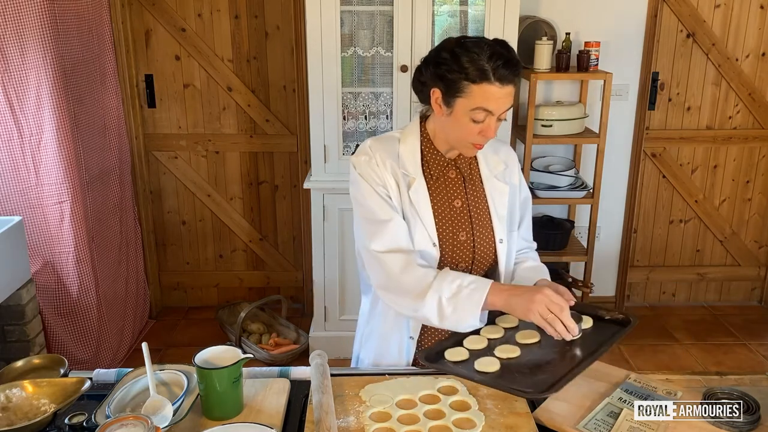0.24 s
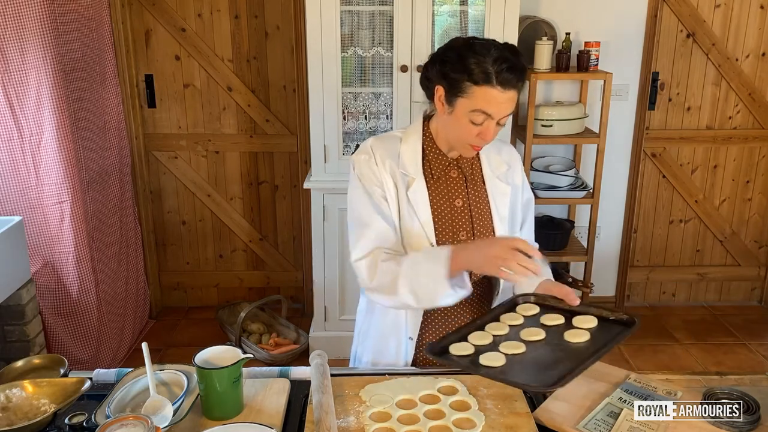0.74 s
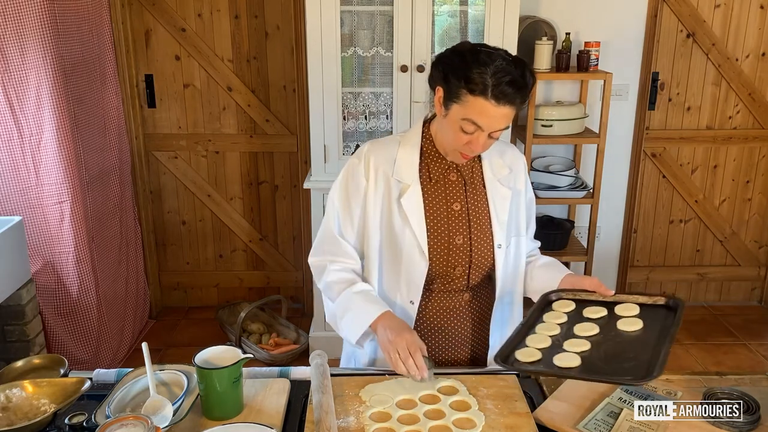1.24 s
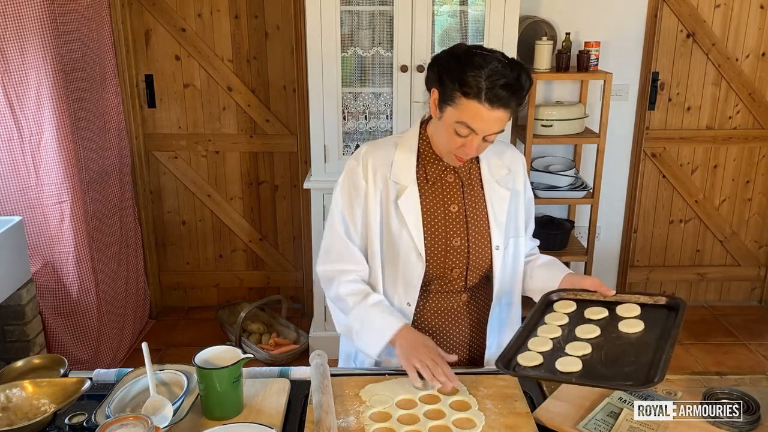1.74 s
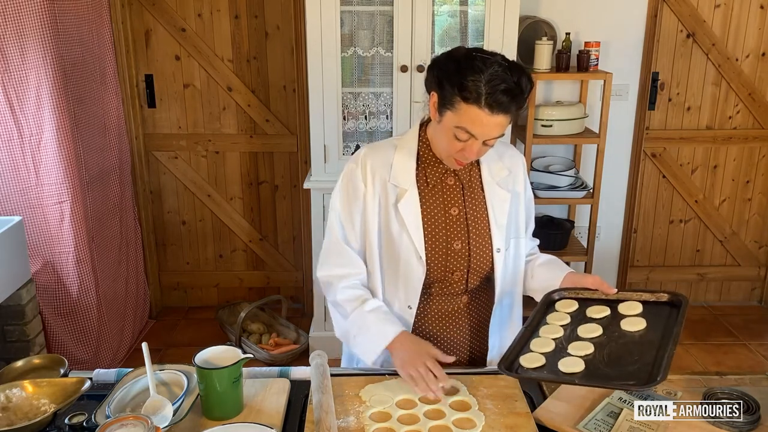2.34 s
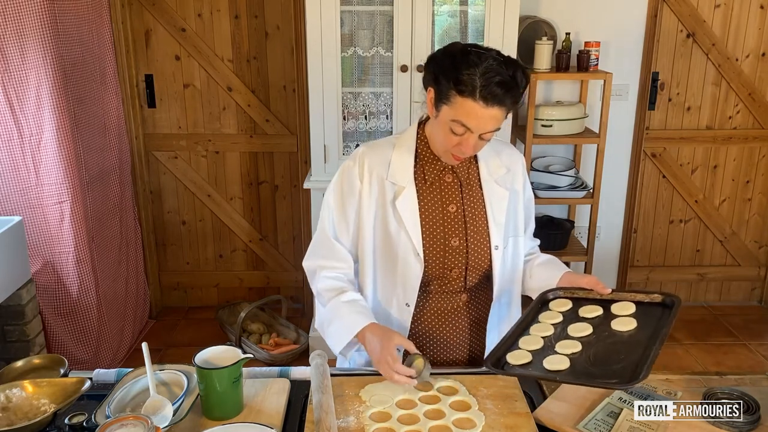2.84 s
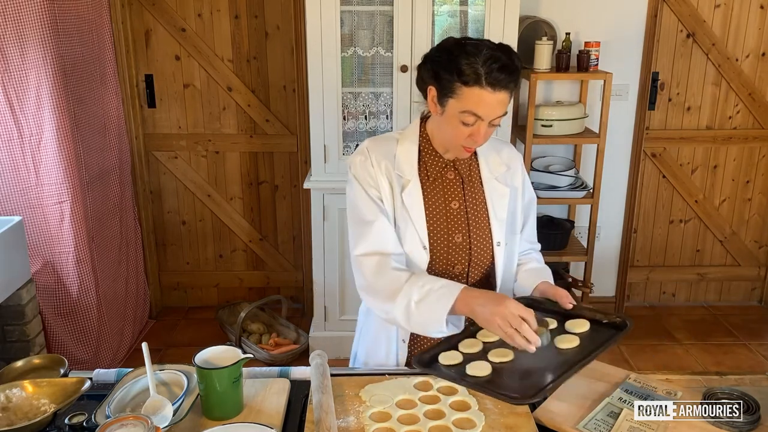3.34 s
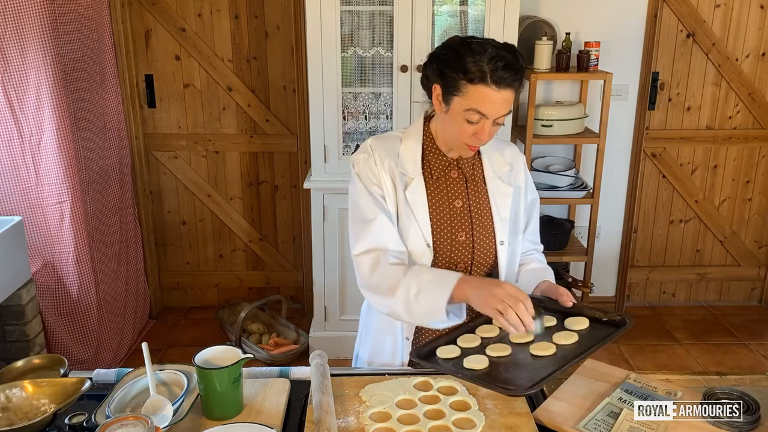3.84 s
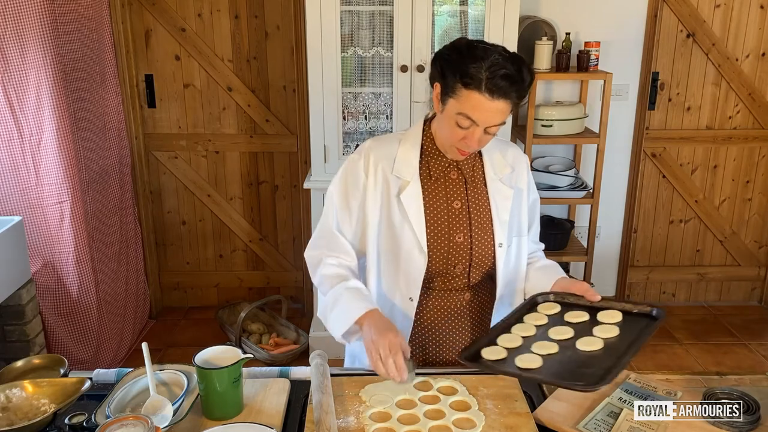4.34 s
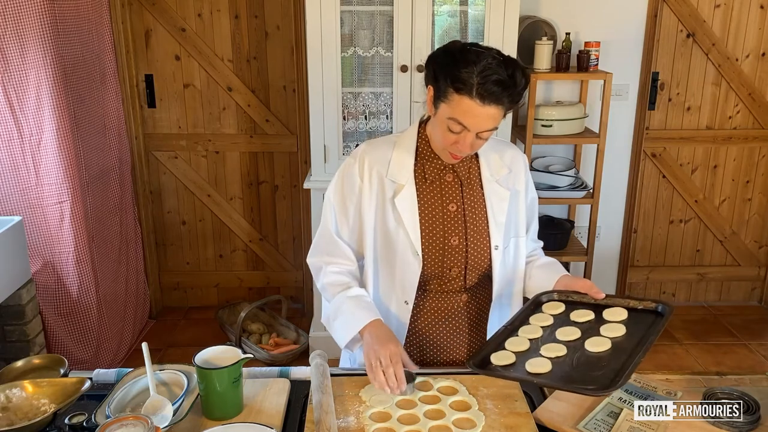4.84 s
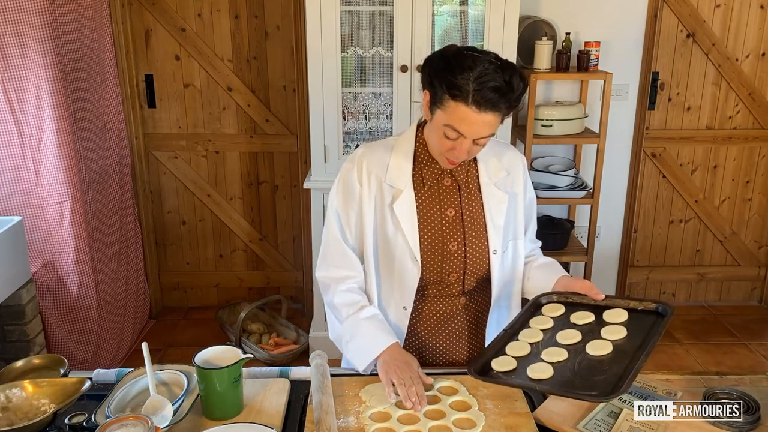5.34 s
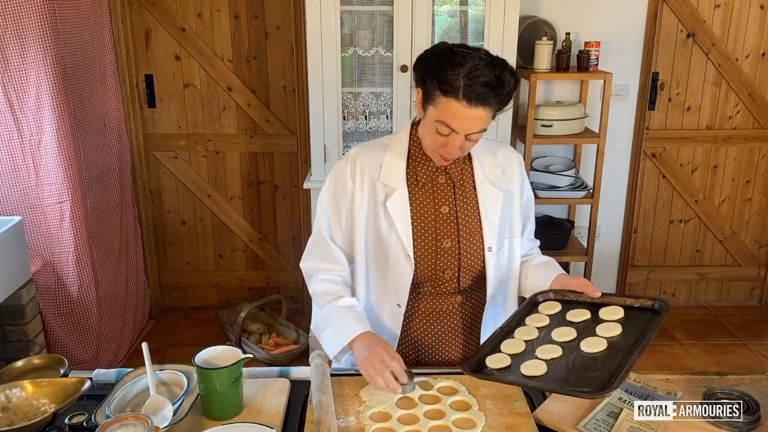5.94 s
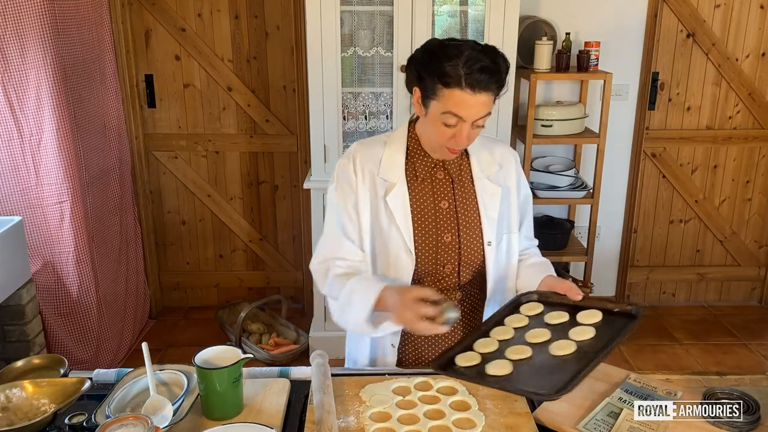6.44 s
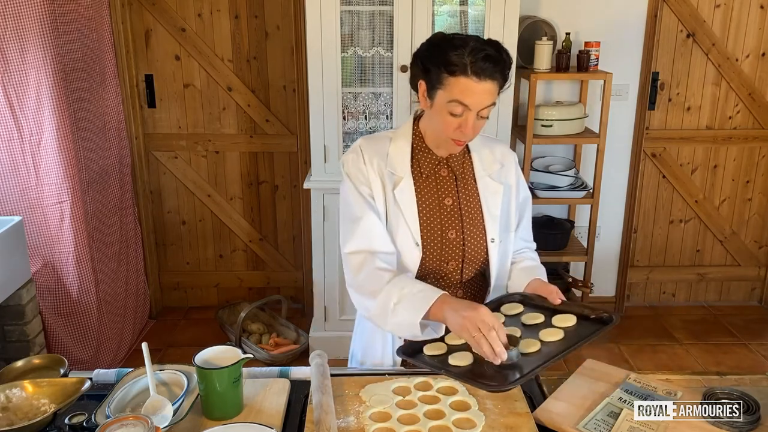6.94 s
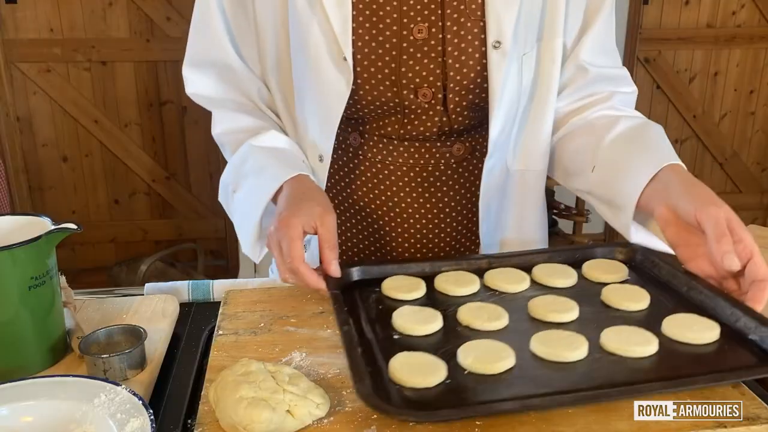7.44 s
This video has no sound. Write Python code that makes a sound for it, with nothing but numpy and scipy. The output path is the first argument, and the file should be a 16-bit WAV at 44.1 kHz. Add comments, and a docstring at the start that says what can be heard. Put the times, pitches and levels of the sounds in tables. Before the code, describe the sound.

A person cuts dough rounds in a bare, echoing kitchen. A coat sleeve rustles faintly; the metal cutter lands with a rocking, dull triple knock, then a hard clack on the wooden board with a worktop boom. Faint thumps follow, then a chink, another landing and an equally loud clack. Soft thumps and tiny tray ticks end it. Close single-channel microphone, light hiss.

```python
"""Pastry cutter on a wooden board

Place: a bare, echoing kitchen. A metal cutter is knocked through dough onto a board: dying sines for
the clack, slower ones for the worktop's boom. Soft, dull thumps, chinks of the cutter and small ticks
are dying sines too; a cotton coat rustles as shaped noise, and a falling sine squeaks. Behind them lie
still air, microphone hiss and a faint rumble, all noise. Distance: the first echo travels about 0.9 m
further than the direct sound. Microphone: one channel, without the deepest bass and the top treble."""
import sys
import numpy as np
from scipy import signal
from scipy.io import wavfile
from scipy.ndimage import uniform_filter1d

SR = 44100
rng = np.random.default_rng(int(sys.argv[2]) if len(sys.argv) > 2 else 0)


def master(y):
    """Save y as 16-bit WAV."""
    cut = np.clip(np.atleast_2d(y).T, -1, 1)
    pcm = np.round(cut * 32767)  # scale
    wavfile.write(sys.argv[1], SR, pcm.astype(np.int16))


N = 339570  # length in samples


def gain_of(db):
    """Amplitude factor of a level in dB."""
    return 10 ** (np.asarray(db) / 20)


def evened(x):
    """Scale to an RMS of 1."""
    return x / np.sqrt(np.mean(x ** 2) + 1e-20)


def read(points, hz):
    """Read a curve of (frequency, value) between its points, on a log frequency axis."""
    f, value = np.transpose(points)
    return np.interp(np.log(hz + 1), np.log(f + 1), value)


def add(mix, s, sound):
    """Lay a sound into the mix from second s on, cut at the end of the mix."""
    part = mix[round(s * SR):][:len(sound)]
    part += sound[:len(part)]


def hump(peak_s, rise_s, fall_s, drop_db):
    """A rounded swell of height 1 that lies drop_db at its rise time before and fall time after the peak."""
    t = np.arange(N) / SR - peak_s
    side_s = np.where(t < 0, rise_s, fall_s)
    return gain_of(drop_db * (t / side_s) ** 2)


def noise(colour, patchy_db):
    """Noise of RMS 1 from random short-time spectra, with patches that drift over time and pitch."""
    hz = np.fft.rfftfreq(1024, 1 / SR)
    real, imag, patches = rng.standard_normal((N // 256 + 5, 513, 3)).T
    patches = uniform_filter1d(patches, size=12, axis=0)  # along frequency
    patches = evened(uniform_filter1d(patches, size=10, axis=1))  # along time
    level_db = read(colour, hz)[:, None] + patchy_db * patches
    spectra = (real + 1j * imag) * gain_of(level_db)
    return evened(signal.istft(spectra, nperseg=1024, noverlap=768)[1][:N])


def ring(modes, lean_db=0, rise_turns=1e-3):
    """Dying sines that swell over some turns; neighbouring modes start in opposite directions."""
    longest_s = max(t60 for _, _, t60 in modes)
    t = np.arange(min(round(longest_s * SR), 3 * SR)) / SR
    hz, db, t60 = np.transpose(modes)[:, :, None]
    sign = (-1.) ** np.arange(len(modes))[:, None]
    swell = 1 - np.exp(-hz * t / rise_turns)
    decay = gain_of(db + lean_db - 60 * t / t60)
    return (sign * swell * decay * np.sin(2 * np.pi * hz * t)).sum(0)


def struck(body, contact_hz):
    """A longer contact dulls the ring; a small body sends out no deep bass; peak 1."""
    r = np.exp(-2 * np.pi * contact_hz / SR)
    dull = signal.lfilter([1], [1, -2 * r, r * r], body)
    thin = signal.sosfilt(signal.butter(2, 170., "highpass", fs=SR, output="sos"), dull)
    return thin / abs(thin).max()


def knocks(blows, board, worktop, boom_db):
    """The board clacks at once; the worktop under it swells and booms on."""
    clack, boom = np.zeros((2, N))
    board_ring, worktop_ring = ring(board), ring(worktop, rise_turns=4.7)
    for s, db, contact_hz, weight_db in blows:
        add(clack, s, gain_of(db) * struck(board_ring, contact_hz))
        add(boom, s, gain_of(db + weight_db + boom_db) * worktop_ring)
    return clack, boom


# still kitchen air and microphone hiss: (frequency [Hz], relative level [dB per Hz])
AIR_COLOUR = [(12, -53), (20, -35), (93, 2.5), (166, 2), (307, -2), (343, -4), (989, -10.5), (1170, -11),
              (1880, -15), (5720, -17.5), (12100, -18), (14300, -19), (15600, -18.5)]


def still_air():
    """Steady noise of the room's air and the microphone's hiss, slightly patchy."""
    return gain_of(-62) * noise(AIR_COLOUR, patchy_db=1.34)


def rumble():
    """A faint, patchy noise in the lowest octaves."""
    # (frequency [Hz], relative level [dB per Hz])
    colour = [(25, -33), (42, -4), (55, -3), (90, -17), (200, -70)]
    return gain_of(-92) * noise(colour, patchy_db=4.0)


# first echoes from worktop, ceiling and walls: (delay [s], relative signed gain [factor])
FIRST_ECHOES = [(.0026, -.6), (.0073, -.4), (.0099, .4), (.014, .3), (.0203, -.85), (.024, -.35),
                (.0287, -.4), (.033, -.35)]
# how long the bare kitchen rings on: (frequency [Hz], time to fall by 60 dB [s])
KITCHEN_T60 = [(100, 1), (300, 0.75), (700, 0.63), (1500, 0.57), (3000, 0.55), (5000, 0.4), (8000, 0.28),
               (14000, 0.46)]


def kitchen(x, echo_db, tail_db, first_s):
    """Single echoes, dulled by the walls, then sparse pulses of random sign that die by band."""
    early, pulses = np.zeros(SR // 10), np.zeros(SR)
    for s, gain in FIRST_ECHOES:
        r = np.exp(-2 * np.pi * min(11.0 / s, 9000) / SR)  # later echoes have lost more treble
        add(early, s, gain * (1 - r) * r ** np.arange(200))
    at = np.arange(round(first_s * SR), SR - 20, 20)  # one pulse in every 20 samples
    pulses[at + rng.integers(0, 20, len(at))] = rng.choice([-1., 1.], len(at))
    hz, t, spectra = signal.stft(pulses, SR, nperseg=256)
    decay = gain_of(-60 * t / read(KITCHEN_T60, hz)[:, None])
    tail = signal.istft(spectra * decay, SR, nperseg=256)[1]
    tail *= gain_of(tail_db) / np.linalg.norm(tail)
    add(tail, 0, gain_of(echo_db) * early)
    return x + signal.fftconvolve(x, tail)[:N]


# fine cotton fibres: (frequency [Hz], relative level [dB per Hz])
FIBRES = [(2000, -15), (4000, -2.5), (6000, -4.5), (9000, -7.5), (12000, -10.5), (15600, -24)]
# folds of the sleeve: (frequency [Hz], relative level [dB per Hz])
SLEEVE_FOLDS = [(200, -7), (500, -3), (1000, 1), (2500, -0.5), (4000, -4.5), (7000, -14)]
# arm swings: (peak time [s], rustle level [dB], rise [s], fall [s], extra level of the folds [dB])
ARM_SWINGS = [(0, -61.5, .1, 0.24, 1.5), (.73, -70.5, 0.13, 0.24, 0.5), (.98, -63.5, .12, 0.27, -0.5),
              (1.2, -68.5, .15, 0.41, 0), (1.74, -62.5, 0.076, 0.17, -1.5), (2.3, -70.5, 0.068, 0.47, 3),
              (3.08, -61, 0.12, .15, -5), (3.2, -62, 0.14, 0.28, 0.5), (4.11, -62.5, 0.1, .22, -2.5),
              (4.33, -69, 0.24, 0.31, 0), (4.84, -77, 0.059, 0.18, 0), (5.02, -65.5, 0.25, 0.25, -2.5),
              (5.55, -69.5, 0.056, 0.38, 5), (6.235, -65.5, .1, .15, -5.5), (6.46, -59, 0.15, 0.32, -2),
              (6.75, -72, .15, .2, 0), (7.25, -65.5, .025, 0.21, -1), (7.45, -69.5, .15, .3, -1),
              (7.7, -71, 0.2, .1, 0.5)]
SWING_DROP_DB, RESTING_DB = -14, -81  # fall of a rustle over its rise or fall time; the coat at rest


def rustle():
    """Cloth slides over cloth: a soft hiss with a fine grain, swelling with each swing of the arm."""
    fine, full = np.full((2, N), gain_of(2 * RESTING_DB))  # powers
    for s, db, rise_s, fall_s, full_db in ARM_SWINGS:
        power = (gain_of(db) * hump(s, rise_s, fall_s, SWING_DROP_DB)) ** 2
        fine = fine + power
        full = full + power * gain_of(2 * full_db)
    grain_db = evened(uniform_filter1d(rng.standard_normal(N), size=90))
    fibres = np.sqrt(fine) * noise(FIBRES, patchy_db=1.0)
    folds = np.sqrt(full) * gain_of(4.5) * noise(SLEEVE_FOLDS, patchy_db=1.0)
    return (fibres + folds) * gain_of(grain_db)


def squeak():
    """A faint, short whistle: a sine that falls in pitch as it dies."""
    start_s, start_db, start_hz = 6.229, -61, 3740
    rise_s, t60_s, sag_hz_per_s = .004, .22, 7500
    t, out = np.arange(SR // 10) / SR, np.zeros(N)
    level = np.minimum(t / rise_s, 1) ** 2 * gain_of(start_db - 60 * t / t60_s)
    turns = np.cumsum(start_hz - sag_hz_per_s * t) / SR
    add(out, start_s, level * np.sin(2 * np.pi * turns))
    return out


# rings of a thump: (frequency [Hz], relative level [dB], time to fall by 60 dB [s])
THUMP_RINGS = [(220, -4, 0.044), (338, 0, 0.052), (448, -0.5, 0.035), (559, -6, 0.096), (726, 3.5, 0.02),
               (908, -1, 0.032), (2100, 17.5, 0.0043), (3300, 12, 0.006)]
# soft, dull thumps, of the tray or of the cutter at the board:
# (time [s], peak level [dB], contact cut-off [Hz], pitch that this thump favours [Hz])
SOFT_THUMPS = [(3.616, -48.5, 700, 460), (3.836, -50, 800, 604), (5.995, -41, 910, 600),
               (7.0062, -41, 795, 480), (7.613, -51.5, 1000, 1200)]
# small ticks on the rim of the tray: (time [s], pitch [Hz], level [dB], time to fall by 60 dB [s])
RIM_TICKS = [(7.286, 4200, -62, .012), (7.308, 2700, -58, 0.045), (7.618, 3400, -51, 0.018),
             (7.646, 3370, -55, .02), (7.665, 5040, -47, .008), (7.665, 8100, -45, 0.0045)]


def thumps_and_ticks():
    """Soft, dull thumps of quickly dying rings, each favouring its own pitch, and small bright ticks."""
    favour_db, favour_octaves = 5, .35  # lift and width of the favoured pitch
    out, hz = np.zeros(N), np.transpose(THUMP_RINGS)[0][:, None]
    for s, db, contact_hz, favoured_hz in SOFT_THUMPS:
        lean_db = favour_db * np.exp(-(np.log2(hz / favoured_hz) / favour_octaves) ** 2)
        add(out, s, gain_of(db) * struck(ring(THUMP_RINGS, lean_db), contact_hz))
    for s, *mode in RIM_TICKS:
        add(out, s, ring([mode]))
    return out


# rings of the metal cutter: (frequency [Hz], relative level [dB], time to fall by 60 dB [s])
CUTTER_RINGS = [(1860, -4.5, 0.017), (4520, -17, .012), (5020, -8, 0.023), (5500, -16, .02),
                (5800, -14, 0.015), (7000, -8, 0.014), (9080, -3.5, 0.022), (10640, 2.5, 0.011),
                (11250, -2.5, 0.031), (11330, -18, 0.25), (11700, -12, .015), (12800, -2, 0.018),
                (13120, -8, .012), (13950, -14, .012)]
# the cutter chinks: (time [s], blow level [dB], level added to the rings that the fingers damp [dB])
CUTTER_CHINKS = [(2.545, -62, 2), (4.829, -41, -17), (5.0309, -33, 0)]


def chinks():
    """The fingers damp most rings of the cutter at once; one sings on."""
    out = np.zeros(N)
    damped = np.array([[t60 < .08] for _, _, t60 in CUTTER_RINGS])
    for s, db, damped_db in CUTTER_CHINKS:
        add(out, s, gain_of(db) * ring(CUTTER_RINGS, damped * damped_db))
    return out


# board under uncut dough: (frequency [Hz], relative level [dB], time to fall by 60 dB [s])
BOARD_UNDER_DOUGH = [(560, 1.5, 0.0043), (880, 0, 0.013), (1084, -1, 0.016), (1334, -3, 0.018),
                     (1830, 3, 0.0049), (2550, 2, 0.005), (3370, 1, 0.003), (4840, 0, 0.0018)]
# worktop under uncut dough: (frequency [Hz], relative level [dB], time to fall by 60 dB [s])
WORKTOP_UNDER_DOUGH = [(46.8, -13, 1), (95, -13.5, 0.97), (143.8, 2.5, 0.28), (190.5, -5, 0.26),
                       (220.4, 2, 0.33), (244.4, -2, 0.45), (309.5, -7, 0.55), (406, -6, 0.35),
                       (495, -6, 0.47), (552, -1.5, 0.35), (682, -6, 0.35), (900, -24, 0.29),
                       (906, -12, 0.3)]
# the cutter is set down on the dough and rocks: (time [s], peak level of the clack [dB],
# contact cut-off [Hz], higher when harder, relative weight into the worktop [dB])
DOUGH_LANDINGS = [(1.8873, -43, 700, -9), (1.8895, -22, 1520, 1), (1.922, -26, 1370, -1.5),
                  (1.953, -25, 960, -7.5), (5.1262, -45, 695, 1), (5.1274, -19, 1960, 0)]


def landings():
    """The cutter meets uncut dough, which pads the board and worktop: a duller clack and a boom."""
    return knocks(DOUGH_LANDINGS, BOARD_UNDER_DOUGH, WORKTOP_UNDER_DOUGH, boom_db=-19.0)


# bare board: (frequency [Hz], relative level [dB], time to fall by 60 dB [s])
BARE_BOARD = [(606, 0, 0.012), (980, 4.5, 0.0086), (1320, 6, 0.0055), (1655, 3.5, 0.0084),
              (2134, 5.5, 0.0074), (2546, 1.5, 0.0055), (3507, 3.5, 0.0047), (4260, -9.5, 0.027),
              (4860, 1, 0.007), (6210, 1.5, 0.0044), (8240, 0.5, 0.0016), (11500, -22, .004)]
# worktop under the bare board: (frequency [Hz], relative level [dB], time to fall by 60 dB [s])
BARE_WORKTOP = [(43, -31, 6.3), (44, -15, 0.94), (48.4, -20, 1.5), (53.5, -23, 1), (97.3, 3.5, 0.45),
                (104, 0, 0.31), (167.4, -10.5, 0.43), (233.5, 6, 0.34), (246, -3.5, 0.76),
                (299.7, -14, 0.87), (355, -0.5, 0.47), (462.3, 3.5, 0.34), (557, 1.5, 0.54), (607, 4, 0.51),
                (705, 1, 0.53), (862.5, -10, 0.69), (936, -3.5, 0.6), (1025, -7, 0.53)]
# the cutter is stamped through to the board: (time [s], peak level of the clack [dB],
# contact cut-off [Hz], relative weight into the worktop [dB])
BOARD_STAMPS = [(2.336, -9.5, 2500, -3), (5.5753, -9.5, 2480, -3)]


def stamps():
    """Metal strikes wood through the dough: a hard clack of the board and a boom of the worktop."""
    return knocks(BOARD_STAMPS, BARE_BOARD, BARE_WORKTOP, boom_db=-22.5)


def scene():
    """Clacks, thumps, ticks and chinks echo in the kitchen; booms and soft sounds are added dry."""
    landing, landing_boom = landings()
    stamp, stamp_boom = stamps()
    background = still_air() + rumble() + rustle() + squeak()
    hits = kitchen(thumps_and_ticks(), echo_db=-8, tail_db=-2.5, first_s=0.00601)
    hits += kitchen(chinks(), echo_db=-29, tail_db=-5.0, first_s=0.0073)
    hits += kitchen(landing, echo_db=-4.5, tail_db=-1.5, first_s=0.0043)
    hits += kitchen(stamp, echo_db=2.0, tail_db=-0.5, first_s=.005)
    return (background + hits + landing_boom + stamp_boom)[None]


def record(dry):
    """The microphone drops the deepest bass; then a steep low-pass limits the band."""
    edge_hz = 15680
    thin = signal.sosfilt(signal.butter(5, 36., "highpass", fs=SR, output="sos"), dry)
    band_limit = signal.firwin(511, edge_hz, window=("kaiser", 9), fs=SR)
    return signal.oaconvolve(thin, band_limit[None], "same")


dry = scene()
out = record(dry)
master(out)
```